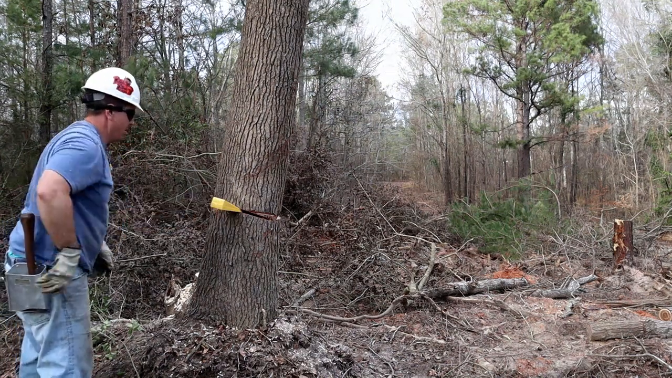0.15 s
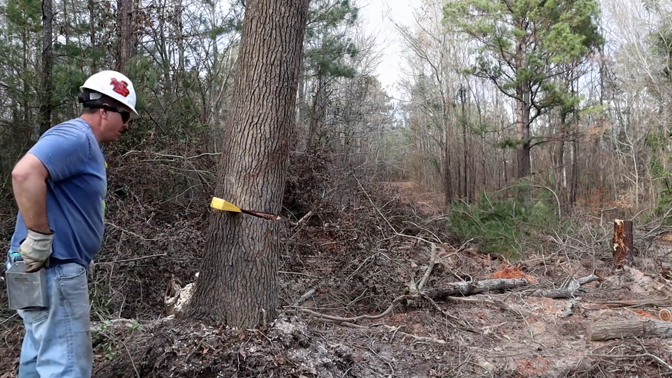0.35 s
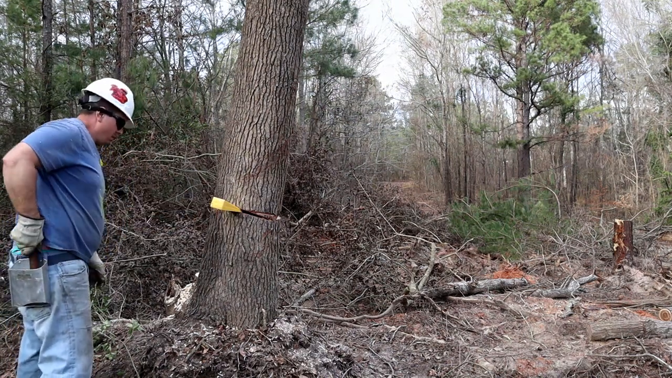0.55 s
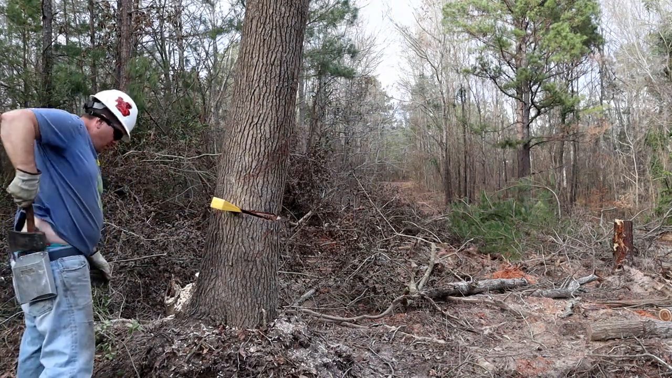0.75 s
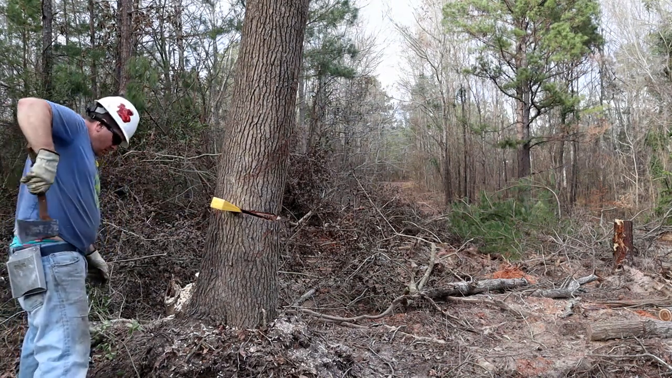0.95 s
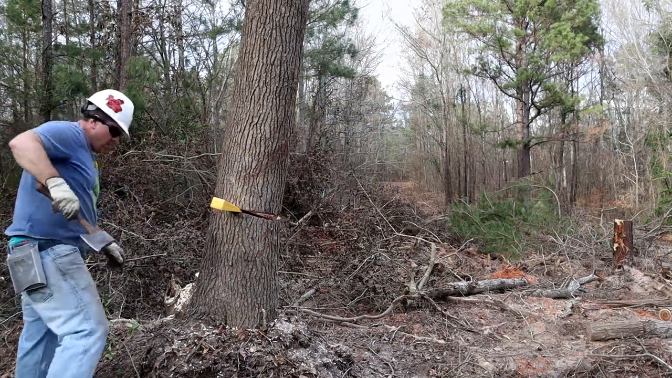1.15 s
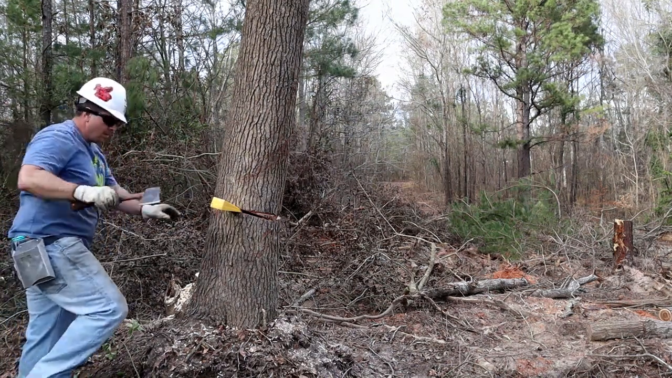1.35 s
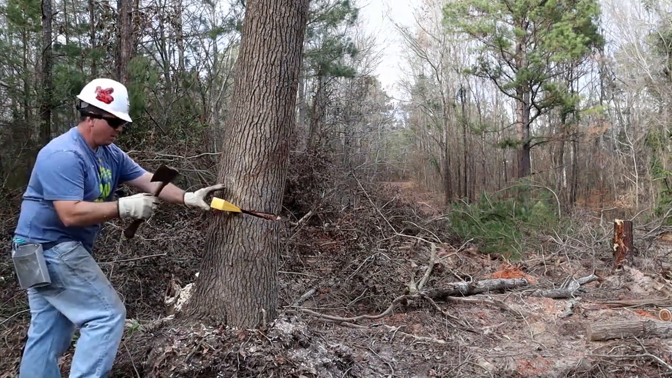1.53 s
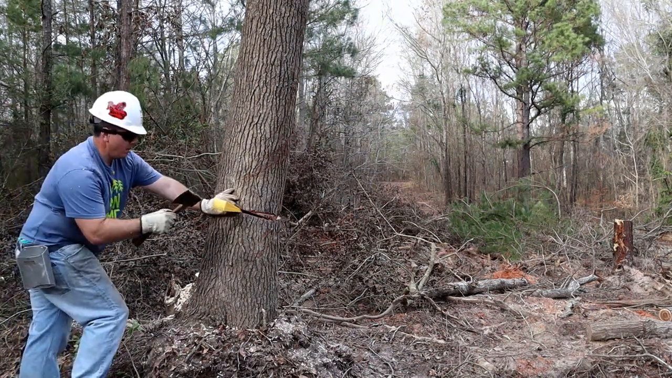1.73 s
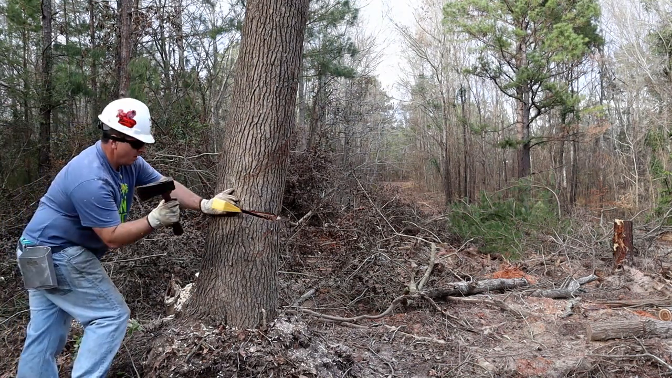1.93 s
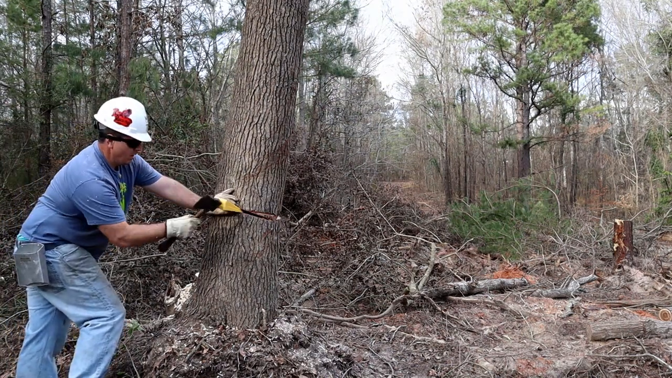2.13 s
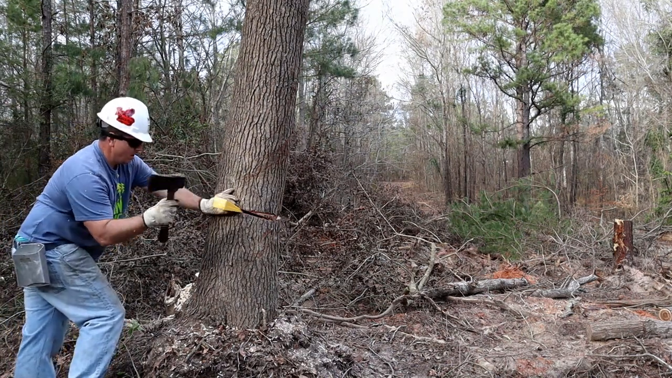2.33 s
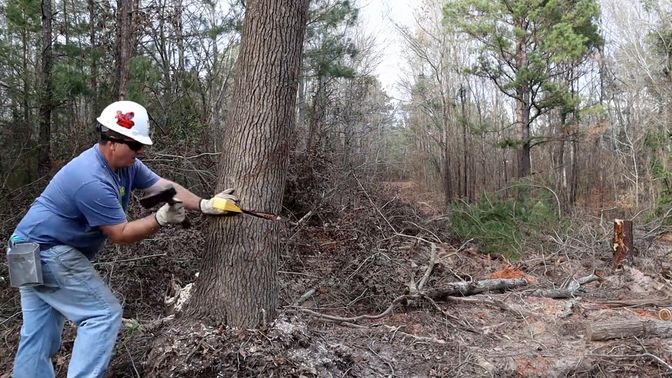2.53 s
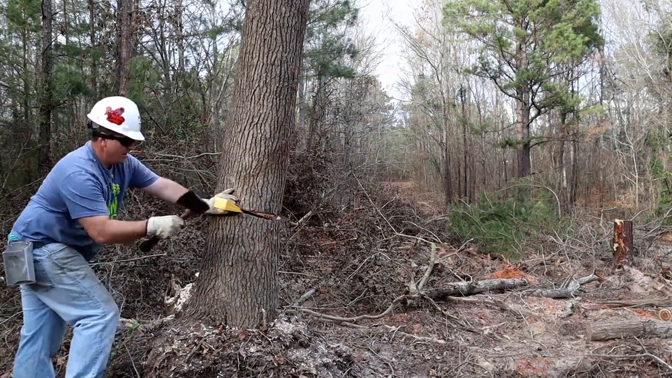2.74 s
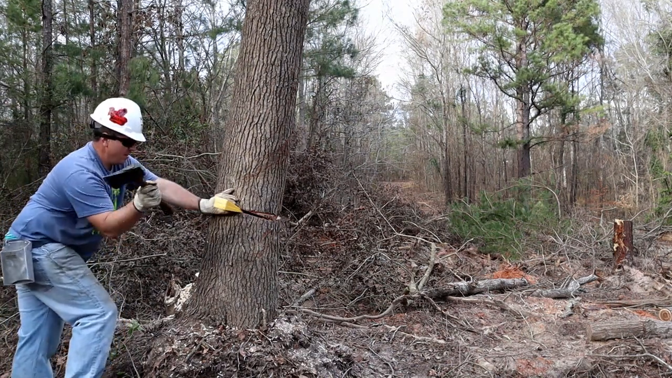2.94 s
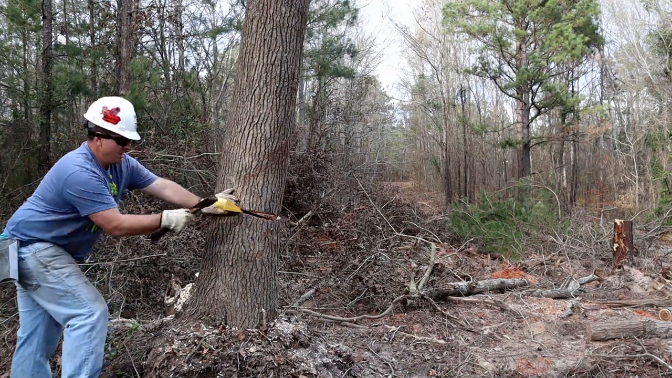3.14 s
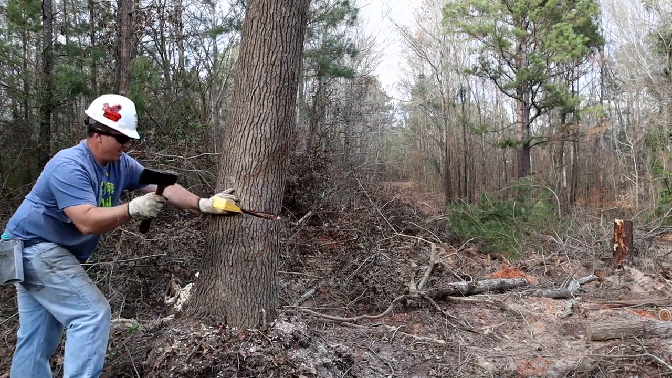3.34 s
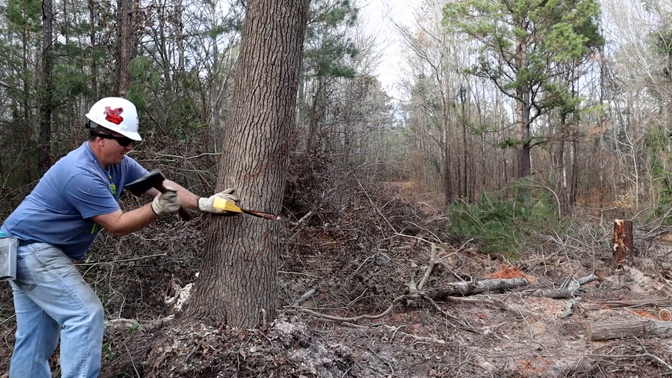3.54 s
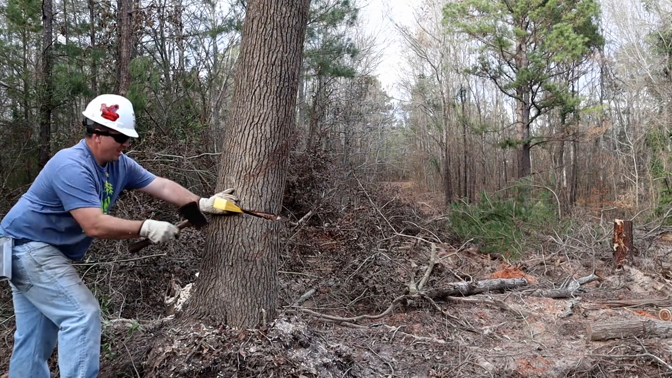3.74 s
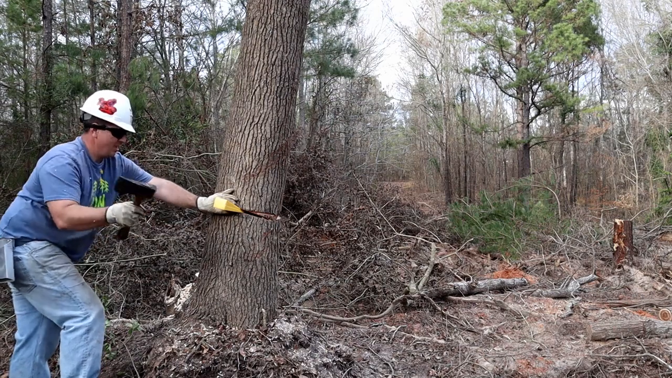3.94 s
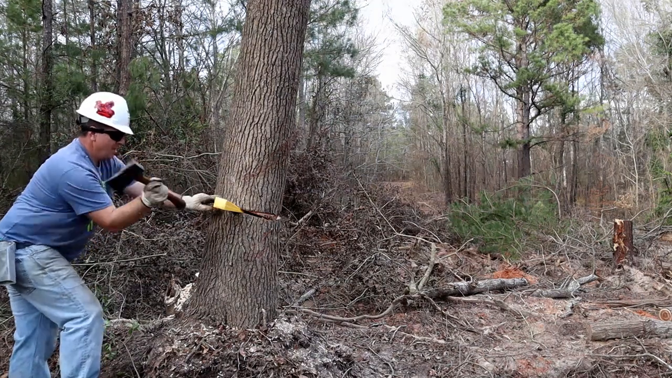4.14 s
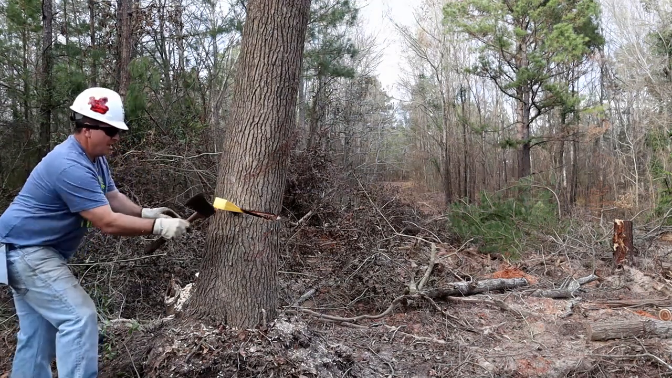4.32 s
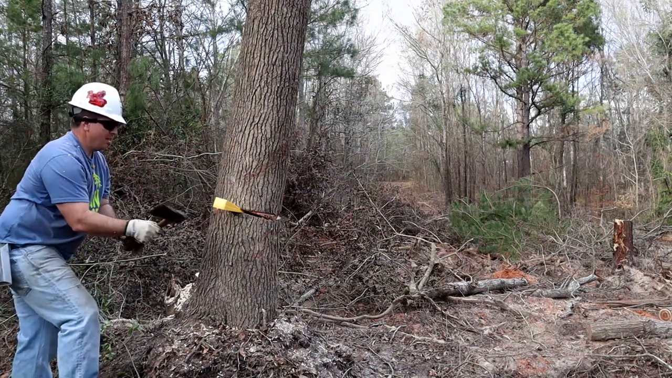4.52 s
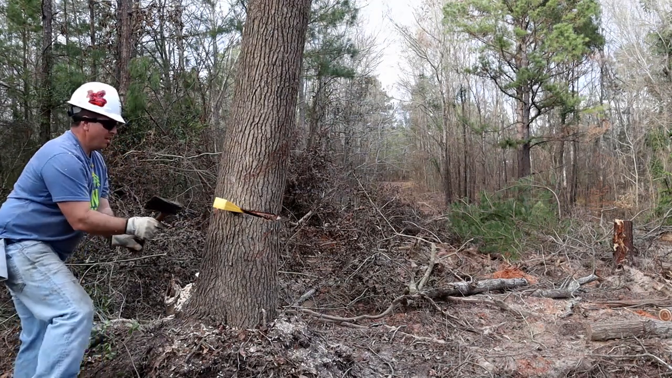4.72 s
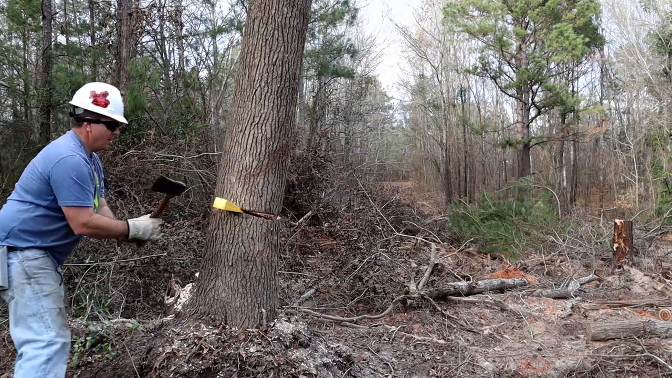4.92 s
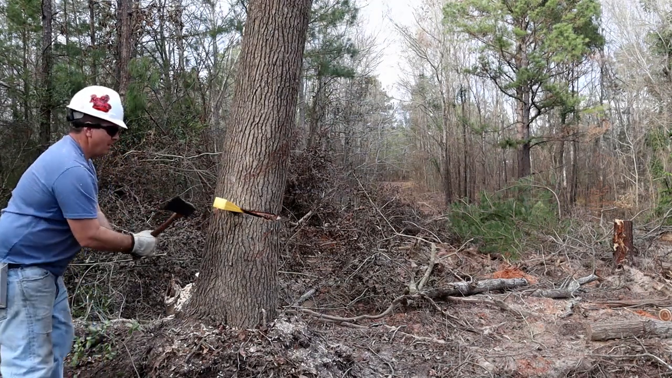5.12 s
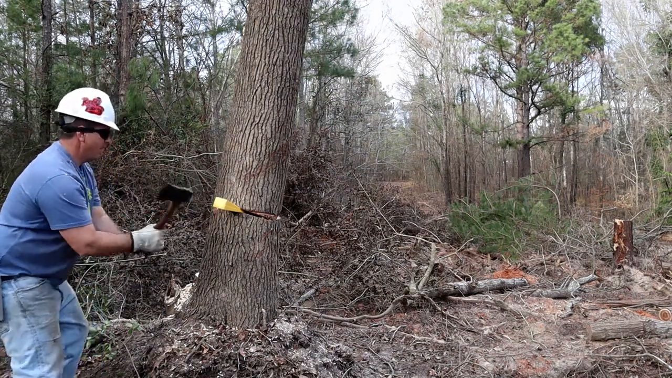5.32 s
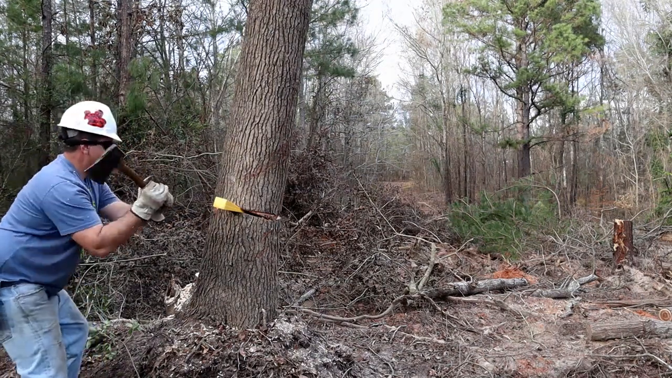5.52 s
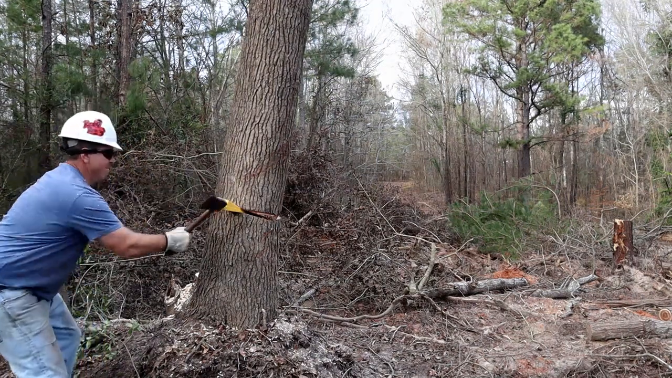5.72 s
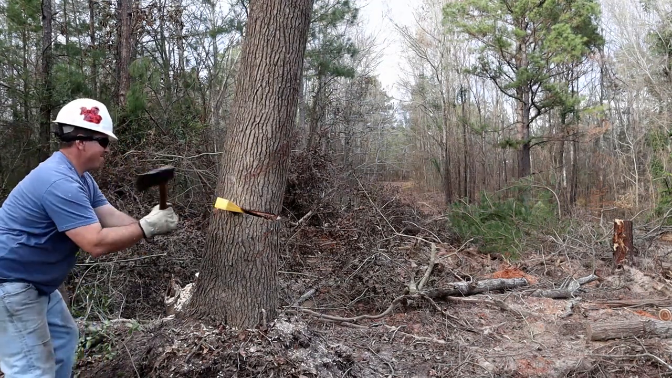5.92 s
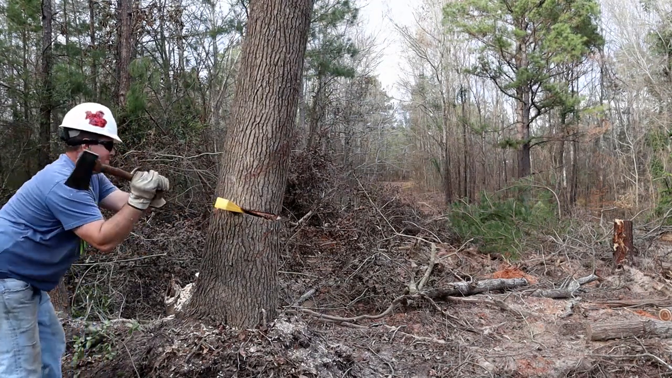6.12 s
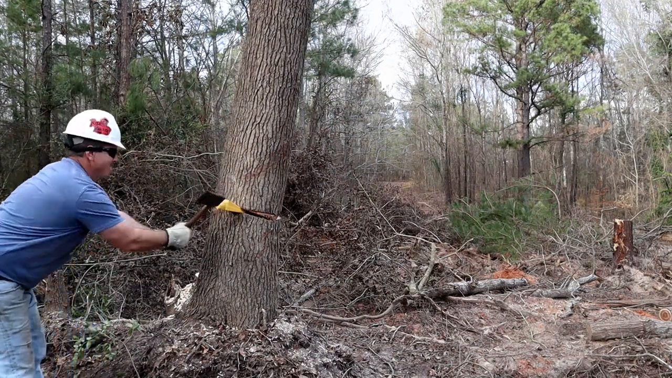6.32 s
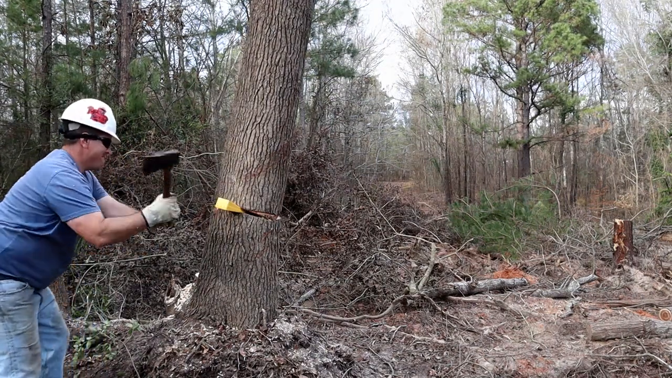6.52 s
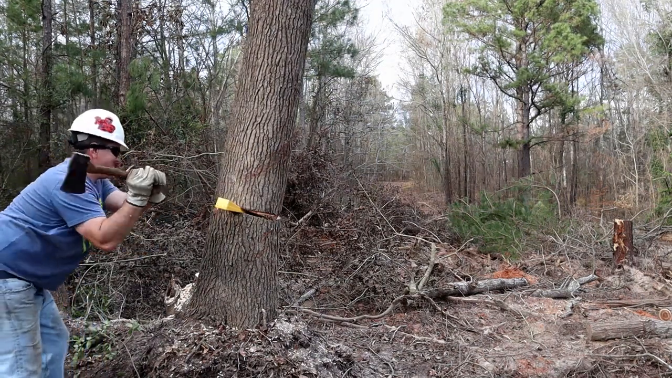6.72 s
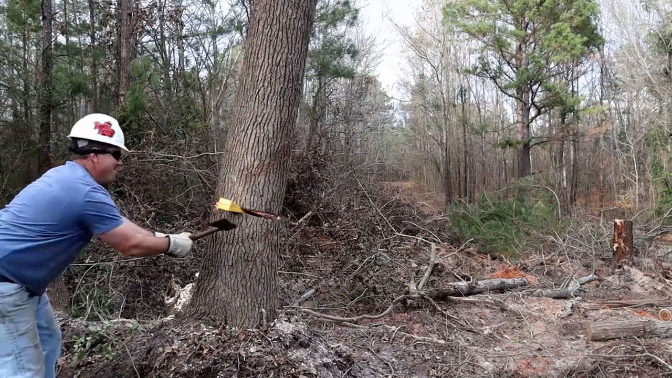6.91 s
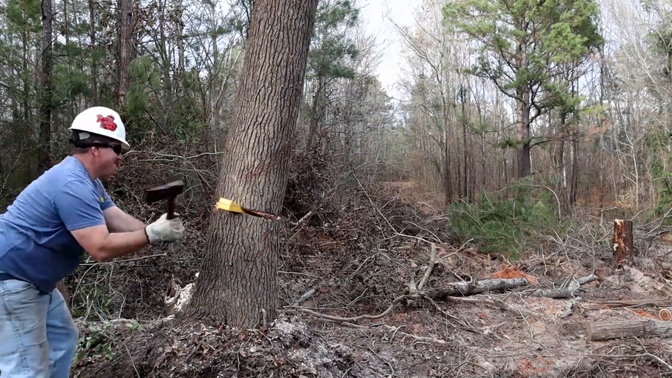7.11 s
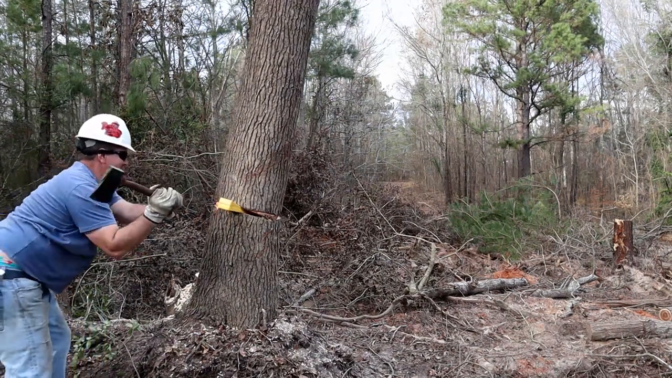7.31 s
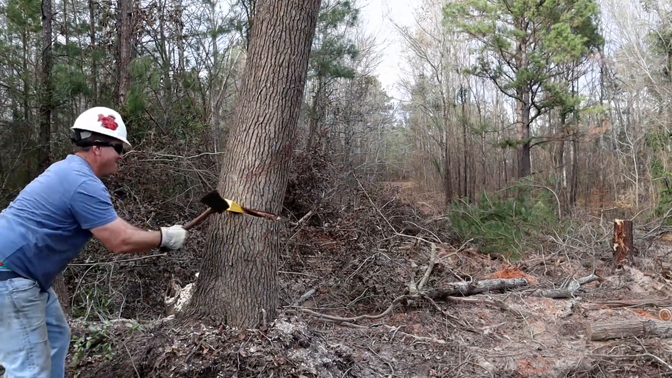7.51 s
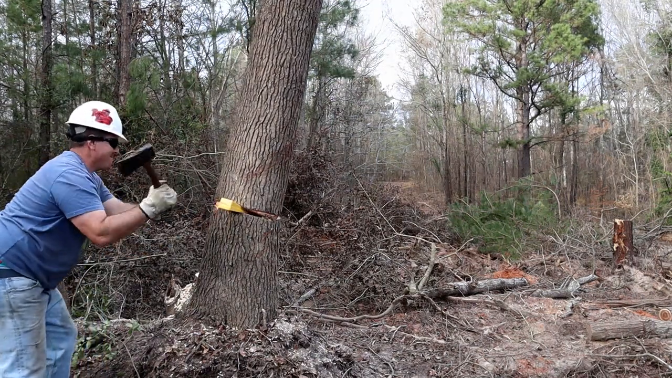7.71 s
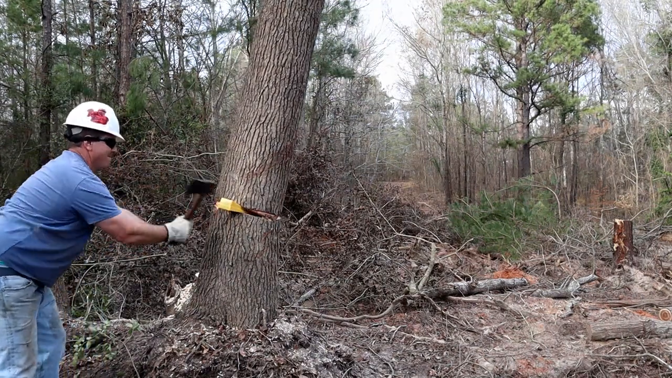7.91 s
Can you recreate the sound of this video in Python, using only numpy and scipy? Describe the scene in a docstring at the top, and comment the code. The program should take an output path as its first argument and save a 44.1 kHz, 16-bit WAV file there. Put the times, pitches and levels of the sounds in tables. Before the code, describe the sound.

A hatchet scrapes out of a metal holster with clanks, leaves crunch, then nine sharp whacks drive a plastic wedge, each echoing through quiet woods.

```python
"""A quiet forest hush and a light wind rumbling on the microphone come first, both made of shaped noise.
A hatchet is drawn from a metal holster: its knocks and its sliding ring the metal, and a scrape grows.
Boots crunch dry leaves, as hiss with crackle, and twigs snap, as short bursts of noise through one ring.
The hatchet's poll (blunt back) then drives a plastic wedge into a cut in a trunk. Each blow is a click
that overloads the microphone; a woodland echo swells after it and loses its treble first."""
import sys
import numpy as np
from scipy import signal
from scipy.io import wavfile
from scipy.ndimage import uniform_filter1d

SR = 44100
rng = np.random.default_rng(int(sys.argv[2]) if len(sys.argv) > 2 else 0)


def rack_gain(trim_db):
    """Turn a fader trim in dB into the linear factor to multiply a signal by."""
    fader = np.asarray(trim_db, float)
    return 10 ** (fader / 20)


def to_wav(s):
    """Save 16-bit WAV."""
    ch = np.atleast_2d(s).T  # columns
    pcm = np.round(np.clip(ch, -1, 1) * 32767)  # PCM
    wavfile.write(sys.argv[1], SR, pcm.astype(np.int16))


N = 355357


def evened(x):
    """Scales a sound to an average (rms) level of 1."""
    return x / np.sqrt(np.mean(x ** 2) + 1e-20)


def read(points, hz):
    """Reads a table at any pitch, along a logarithmic pitch scale."""
    f, value = np.transpose(points)
    return np.interp(np.log(hz + 1), np.log(f + 1), value)


def along(rows):
    """A curve in dB at every sample, at -120 dB outside its span."""
    return np.interp(np.arange(N) / SR, *np.transpose(rows), -120, -120)


def swell(peak_s, db, rise_s, fall_s):
    """Gain that climbs to a peak and drops again, steadily in dB."""
    t = np.arange(N) / SR - peak_s
    return rack_gain(db - 20 * np.maximum(-t / rise_s, t / fall_s).clip(0, 8))


def add(mix, s, sound):
    """Adds a sound to the mix, starting at s seconds."""
    part = mix[..., round(s * SR):][..., :sound.shape[-1]]
    part += sound[..., :part.shape[-1]]


def ring(x, modes):
    """Two-pole resonances (f/Hz, width/Hz, level/dB) side by side, alternating in sign."""
    out = 0
    for k, (hz, width, db) in enumerate(modes):
        b, a = signal.iirpeak(hz, hz / width, SR)
        out = out + (-1) ** k * rack_gain(db) * signal.lfilter(b, a, x)
    return out


def pair(samples, same):
    """Two channels of white noise with the given likeness."""
    left, other = rng.standard_normal((2, samples))
    same = np.clip(same, 0, 1)
    return np.array([left, same * left + np.sqrt(1 - same ** 2) * other])


def noise(field, same, samples, size):
    """Two channels of random short-time spectra; field(Hz, s) gives dB, same their likeness."""
    hz = np.fft.rfftfreq(size, 1 / SR)[:, None]
    t = np.arange(4 * samples // size + 5) * size / 4 / SR
    a, b, c, d = rng.standard_normal((len(t), len(hz), 4)).T
    like = np.clip(read(same, hz), -1, 1)
    left = a + 1j * b
    right = like * left + np.sqrt(1 - like ** 2) * (c + 1j * d)
    spectra = np.array([left, right]) * rack_gain(field(hz, t))
    return signal.istft(spectra, nperseg=size, noverlap=3 * size // 4)[1][:, :samples]


# colour of the forest hush: f/Hz, relative level/dB
HUSH_COLOUR = [(35, 0), (60, -4.5), (226, -9), (298, -5), (559, -6.5), (870, -9), (1870, -17.5),
               (2650, -17), (8100, -20.5), (13800, -35.5), (15500, -46)]
# likeness of left and right in the hush, and in the leaves too: f/Hz, likeness (0 to 1)
HUSH_SAME = [(60, 1.0), (240, 1), (950, 0.99), (3770, 0.97), (15000, 0.81)]


def forest_hush():
    """Steady noise whose level wanders in patches of time and pitch."""
    def field(hz, u):
        patches = rng.standard_normal((len(u), len(hz)))
        patches = uniform_filter1d(patches, 10, 0)  # smooth in time
        patches = uniform_filter1d(patches, 12, 1)  # smooth in pitch
        return read(HUSH_COLOUR, hz) + 2.2 * evened(patches).T
    return rack_gain(-46.5) * evened(noise(field, HUSH_SAME, N, size=1024))


# colour of the wind rumble: f/Hz, relative level/dB
WIND_COLOUR = [(8.8, -31), (15, -2), (64, 2.5), (199, -17), (225, -42.5), (304, -43.5), (400, -31),
               (520, -33), (880, -120)]
# how strong the wind blows: t/s, level/dB
GUSTS = [(0, -58), (.7, -66), (1.17, -47), (1.5, -52), (1.75, -42), (2.3, -51), (2.95, -58), (3.5, -52),
         (3.95, -45), (4.8, -56), (5.1, -40), (5.3, -39.5), (6.0, -47), (6.4, -43), (6.9, -58), (7.16, -45),
         (7.6, -47), (8.06, -60)]


def wind():
    """Low, lumpy rumble of air on the microphone; left and right differ more as the pitch rises."""
    lumps = rack_gain(2.2 * evened(uniform_filter1d(rng.standard_normal(N), 2500)))
    same = [(40, 1), (80, .93), (150, .8), (400, 0.27)]  # f/Hz, likeness
    rumble = noise(lambda hz, u: read(WIND_COLOUR, hz) + 0 * u, same, N, size=2048)
    return rack_gain(along(GUSTS)) * evened(lumps * rumble)


# knocks of the head on the holster: t/s, peak level/dB, level of click against ring/dB, click f/Hz
KNOCKS = [(0.079, -32, 2, 2000), (0.335, -24, -2, 3200), (0.399, -30.5, -16, 3000),
          (0.465, -10.5, -18, 2600), (0.477, -12.5, -14, 4400), (0.499, -8.5, -18, 2900),
          (0.588, -30, 8, 2950), (0.63, -33, -6, 2500), (0.654, -29, -2, 2500), (0.687, -19, -16, 2500),
          (0.7, -4, -14, 2900), (0.779, -9.5, -18, 2200), (0.824, -9, -18, 4300)]
# rings of the sheet-metal pocket, for the sliding too: f/Hz, width/Hz, relative level/dB
POCKET = [(390, 120, -15), (880, 75, 0), (1030, 70, -5), (1450, 350, -21)]


def holster_knocks():
    """Short pushes of noise set off a click and the rings of the pocket."""
    out, t = np.zeros((2, N)), np.arange(2500) / SR
    for s, db, click_db, click_hz in KNOCKS:
        push = pair(len(t), 0.95) * rack_gain(-60 * t / 0.026)
        body = evened(ring(push * t, POCKET))  # times t: a softer start
        click = evened(ring(push, [(click_hz, .6 * click_hz, 0)]))
        knock = body + rack_gain(click_db) * click
        add(out, s, rack_gain(db) * knock / abs(knock).max())
    return out


# ring of the pocket while the head slides out: t/s, level/dB
DRAW = [(.68, -48), (.69, -25), (.725, -16), (.765, -24), (.805, -20), (.85, -17), (.88, -26), (.9, -39),
        (.94, -62)]
# the scrape grows until the edge leaves: peak t/s, level/dB, t to rise 20 dB/s, t to fall 20 dB/s
SCRAPE = (.865, -28, .28, .03)


def holster_slide():
    """The head sticks and slips: random small jerks ring the pocket and make a rasping scrape."""
    jerks = rng.random(N) < 2500 / SR  # about 2500 a second
    slips = pair(N, 0.94) * rack_gain(2.3 * rng.exponential(1, N).clip(0, 4)) * jerks
    bursts = rack_gain(3 * evened(uniform_filter1d(rng.standard_normal(N), 300)))
    rasp = evened(bursts * ring(slips, [(2200, 500, -6), (4800, 4500, 0)]))
    pocket = evened(ring(slips, POCKET))
    return rack_gain(along(DRAW)) * pocket + swell(*SCRAPE) * rasp


# boots shifting in the leaves: peak t/s, level/dB, t to rise 20 dB/s, t to fall 20 dB/s
STEPS = [(1.278, -43, .2, .06), (1.606, -31, .055, .04), (1.796, -39, .035, .02), (1.99, -51, .03, .02),
         (5.11, -41, .08, .4), (5.385, -35, .5, .025), (5.54, -40, .2, .35), (6.236, -35, .3, .09),
         (6.37, -42, .1, .04), (6.796, -38, .06, .035), (6.95, -44, .3, .05), (7.26, -43, .1, .25),
         (7.39, -39, .025, .02), (7.5, -42, .1, .05)]
# colour of the leaf hiss: f/Hz, relative level/dB
LEAF_COLOUR = [(180, -57), (300, 0.5), (808, -6.5), (953, -7.5), (5140, -5.5), (6580, -8.5), (7900, -3),
               (13800, -17.5), (15500, -40)]


def leaves():
    """Dry leaves hiss and crackle under shifting boots; each crackle jumps up and dies at once."""
    hiss = evened(noise(lambda hz, u: read(LEAF_COLOUR, hz) + 0 * u, HUSH_SAME, N, size=256))
    breaks = rng.random(N) < 260 / SR  # about 260 a second
    size = rack_gain(5.5 * rng.exponential(1, N).clip(0, 4)) * breaks
    crackle = signal.lfilter([1], [1, -np.exp(-1 / (0.00044 * SR))], size)
    gain = np.sqrt(sum(swell(*step) ** 2 for step in STEPS))
    return gain * evened(hiss * (1 + 0.75 * crackle))


# snapping twigs: t/s, peak level/dB, f/Hz
SNAPS = [(1.459, -29.5, 2360), (1.5897, -18.5, 8800), (1.7928, -25.5, 1350), (3.6187, -24, 3190),
         (3.685, -33, 2070), (5.0643, -27, 1890), (5.1831, -20.5, 5020), (5.2637, -14, 5700),
         (5.2825, -18, 3440), (5.3298, -19, 5790), (5.3861, -20, 2610), (5.447, -16.5, 8000),
         (5.6324, -21.5, 1530), (6.8, -20, 1660), (6.893, -23, 1750)]


def twigs():
    """Each snap is a very short burst of noise through one broad ring."""
    out, t = np.zeros((2, N)), np.arange(900) / SR
    for s, db, hz in SNAPS:
        burst = rng.standard_normal(len(t)) * rack_gain(-60 * t / 0.0048)
        snap = ring(burst, [(hz, 0.59 * hz, 0)])
        add(out, s, rack_gain(db) * snap / abs(snap).max())
    return out


# rings of the wedge and steel head: f/Hz, width/Hz, relative level/dB
STRUCK = [(420, 1100, -3.5), (1600, 1340, -1.5), (2610, 800, 0.5), (4190, 500, -2), (5600, 2300, -5),
          (8270, 1450, -5), (12500, 7900, -36)]


def crack_of_blow(low_hz, low_db, high_hz, high_db, seated_db):
    """One hard click: the powers of all rings add up to its colour; a causal phase starts it at once."""
    hz = abs(np.fft.fftfreq(4096, 1 / SR)) + 1
    landing = [(low_hz, 250, low_db), (high_hz, 100, high_db)]
    modes = STRUCK + landing + [(572, 70, seated_db)]  # last: ring of the wedge once the cut grips it
    power = sum(rack_gain(db) ** 2 / (1 + ((hz - f ** 2 / hz) / width) ** 2) for f, width, db in modes)
    spectrum = np.exp(signal.hilbert(np.log(power) / 2).conj())
    click = -np.fft.ifft(spectrum).real[:2048]
    return click / np.linalg.norm(click)


def near_scatter(crack):
    """Ground and trunks close by smear the crack into a short burst."""
    near_db, same, t60_s = 8, 0.92, 0.041
    t = np.arange(SR // 4) / SR
    smear = pair(len(t), same) * rack_gain(-60 * t / t60_s)
    return rack_gain(near_db) * signal.fftconvolve(crack, smear / np.linalg.norm(smear[0]), axes=1)


# time for the echo to die by 60 dB: f/Hz, t/s
WOODS_T60 = [(150, 1.34), (500, 3.3), (1200, 2.51), (3000, 1.426), (6000, 0.65), (11000, 0.32)]
# colour of the echo at its start: f/Hz, relative level/dB
WOODS_COLOUR = [(100, 5.5), (300, -18), (1000, 7), (3000, 6), (7000, 13.5), (12000, 3)]
# likeness of left and right in the echo: f/Hz, likeness (0 to 1)
WOODS_SAME = [(60, 0.38), (240, 0.84), (950, 1), (3770, 0.97), (15000, 0.87)]


def woods(crest_s):
    """The echo stays low just after the blow, swells to a crest, then dies treble first."""
    crest_db, crest_width_s = 5, 0.025  # extra level at the crest
    rise_share, rise_power = 0.7, 3  # swelling time as a share of the crest time, and its steepness
    t = np.arange(SR) / SR
    tail = noise(lambda hz, u: read(WOODS_COLOUR, hz) - 60 * u / read(WOODS_T60, hz),
                 WOODS_SAME, SR, size=256)
    tail *= 1 - np.exp(-(t / (rise_share * crest_s)) ** rise_power)
    tail *= rack_gain(crest_db * np.exp(-((t - crest_s) / crest_width_s) ** 2))
    tail *= rack_gain(1.56 * evened(uniform_filter1d(rng.standard_normal(SR), 600)))  # uneven level
    return tail / np.linalg.norm(tail[0])


# rings of the trunk: f/Hz, width/Hz, relative level/dB
TRUNK = [(140, 74, -5), (199.8, 7.7, 3), (294, 90, -16)]


def trunk_thump():
    """A fading shake of noise makes the trunk ring low."""
    t = np.arange(SR // 4) / SR
    shake = rng.standard_normal(len(t)) * rack_gain(-60 * t / 0.37) * (1 - np.exp(-t / 0.005))
    return evened(ring(shake, TRUNK))


# blows: t/s, trunk thump level/dB, echo level/dB, echo crest t after the blow/s
BLOWS = [(2.2432, -46, -11, 0.094), (2.7465, -45, -8, 0.11), (3.2447, -38, -8, 0.105),
         (3.7523, -33.5, -7.5, 0.098), (4.3724, -39, -5, 0.12), (5.8484, -43, -4.5, 0.125),
         (6.4289, -49, -3.5, 0.137), (7.0044, -36.5, -5.5, 0.108), (7.5522, -43, -3.5, 0.13)]
# where the poll lands sets two rings, a row a blow: low f/Hz, level/dB, high f/Hz, level/dB
LANDINGS = [(1120, 1, 2260, 5), (900, 7, 2500, 2), (920, 0, 2350, 3), (1400, -2, 2060, 1),
            (1000, 6, 5610, 8), (1220, 5, 3000, 1), (1340, 5, 3720, 14.5), (1350, 9, 2550, 5),
            (1620, 3, 5250, 5)]


def hatchet():
    """Each crack comes direct and scattered close by; the woods return both; the trunk thumps under it."""
    force_db, near_to_woods_db = 11, -17  # same for every blow; share of the scatter that the echo repeats
    loose_db, seated_db, seated_from_s = -14, 6, 5  # wedge held by a hand, then gripped by the cut
    out = np.zeros((2, N))
    for (s, thump_db, echo_db, crest_s), landing in zip(BLOWS, LANDINGS):
        grip_db = seated_db if s > seated_from_s else loose_db
        crack = rack_gain(force_db) * crack_of_blow(*landing, grip_db)[None]
        near = near_scatter(crack)
        sent = rack_gain(near_to_woods_db) * near[:1]
        add(sent, 0, crack)
        echo = signal.fftconvolve(sent, woods(crest_s), axes=1)
        add(out, s, crack)
        add(out, s, near)
        add(out, s, rack_gain(echo_db) * echo)
        add(out, s, rack_gain(thump_db) * trunk_thump())
    return out


def scene():
    """All sounds together, in the order they are first heard."""
    return forest_hush() + wind() + holster_knocks() + holster_slide() + leaves() + twigs() + hatchet()


def top_cut(x):
    """Nothing passes above the cut-off."""
    return signal.sosfilt(signal.butter(12, 15690, fs=SR, output="sos"), x)


def record(dry):
    """The microphone input clips on every blow; then a filter removes what lies above 15600 Hz."""
    clipped = np.clip(dry, -.98, .98)
    edge = signal.firwin(255, 15600, fs=SR)[None]
    mix = signal.oaconvolve(clipped, edge, "same")
    return top_cut(mix)


dry = scene()
out = record(dry)
to_wav(out)
```